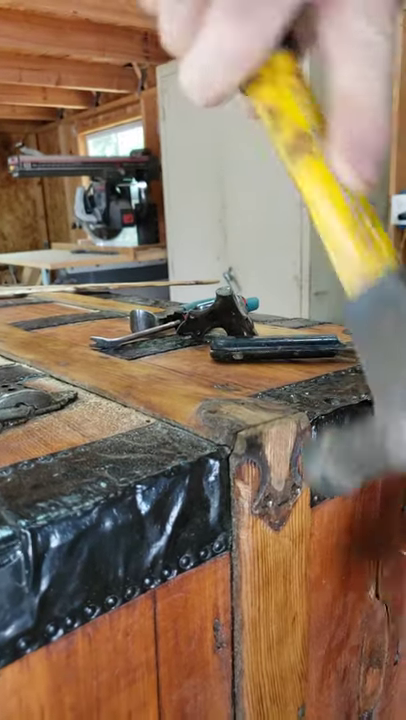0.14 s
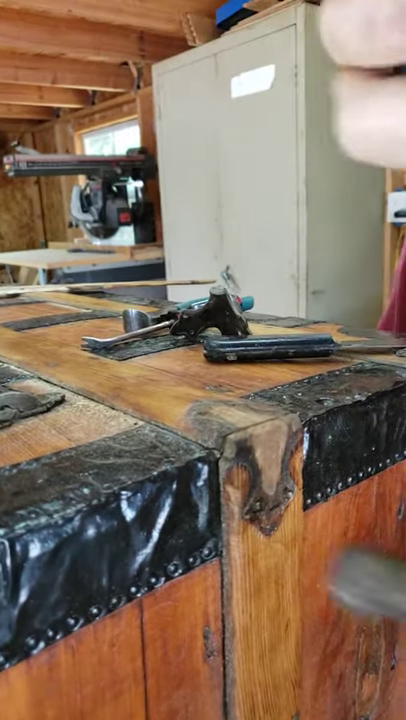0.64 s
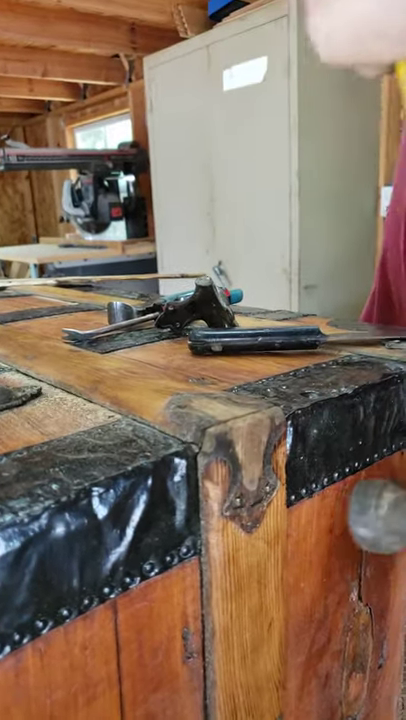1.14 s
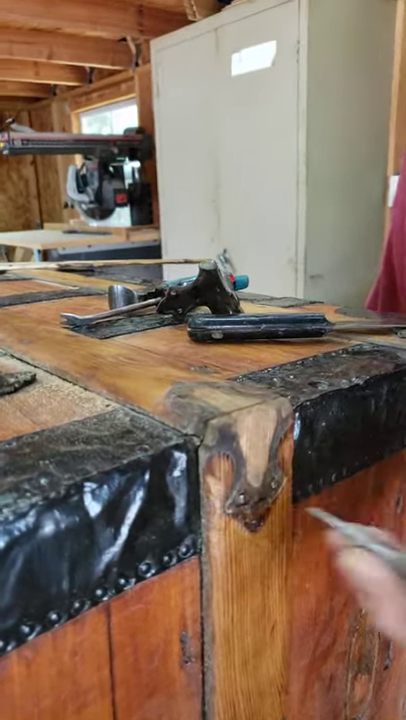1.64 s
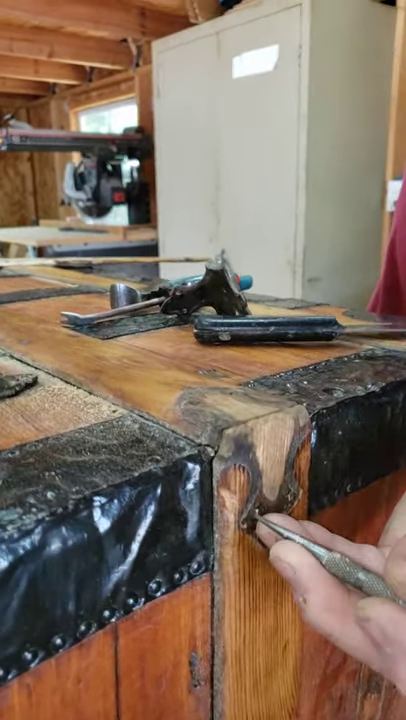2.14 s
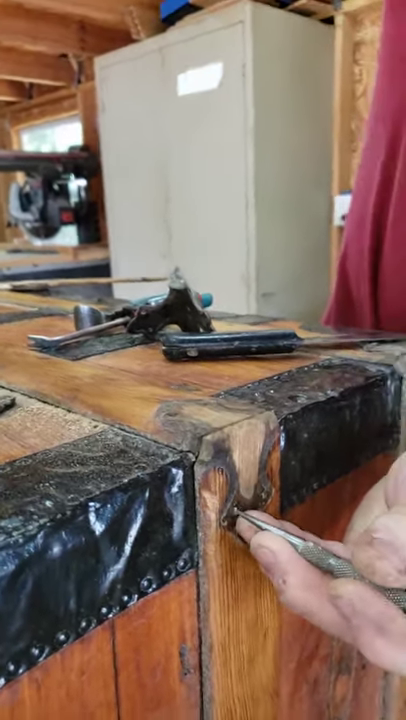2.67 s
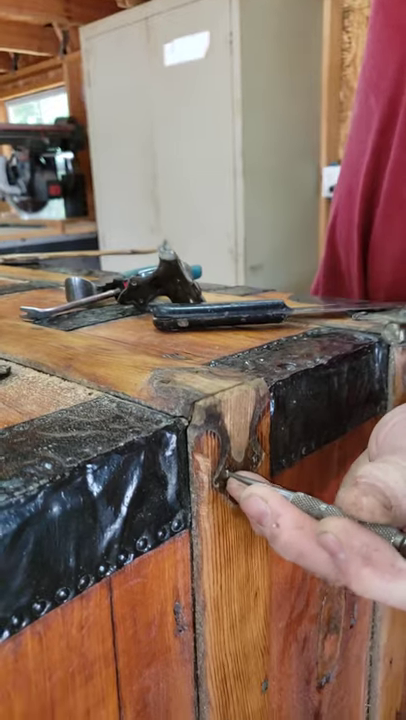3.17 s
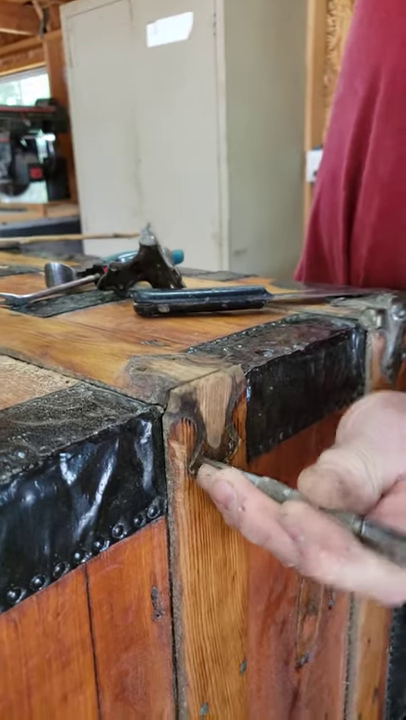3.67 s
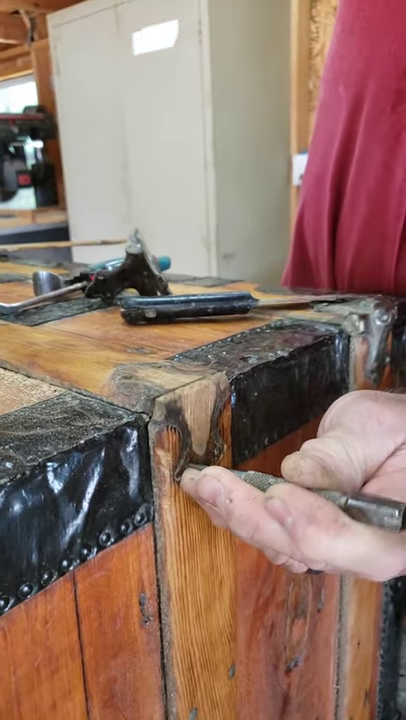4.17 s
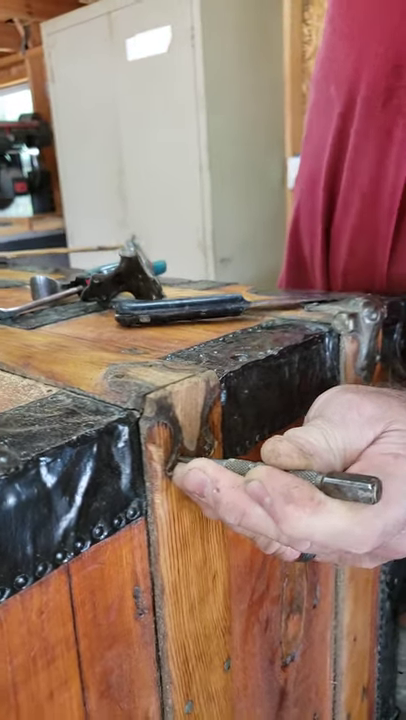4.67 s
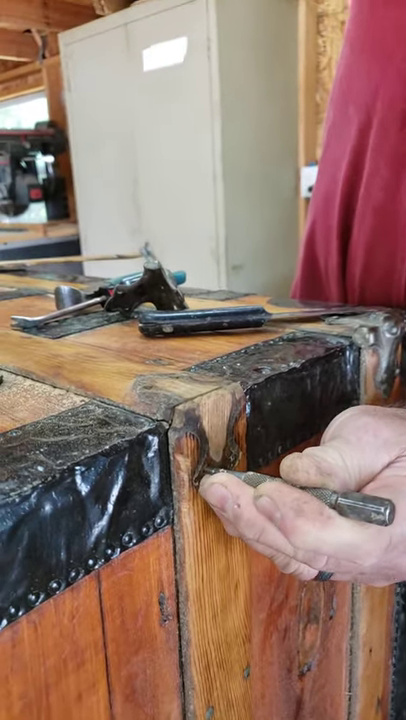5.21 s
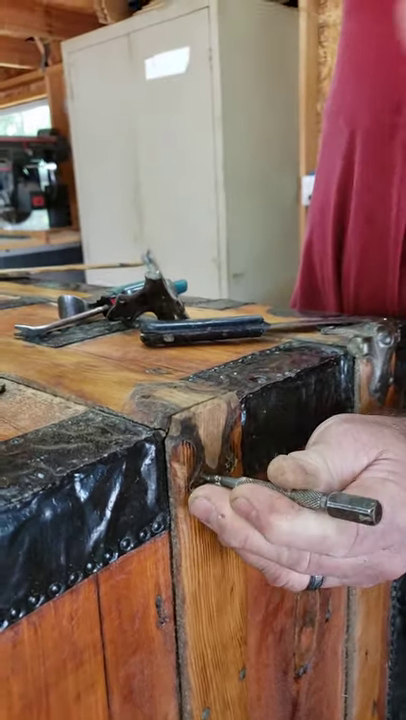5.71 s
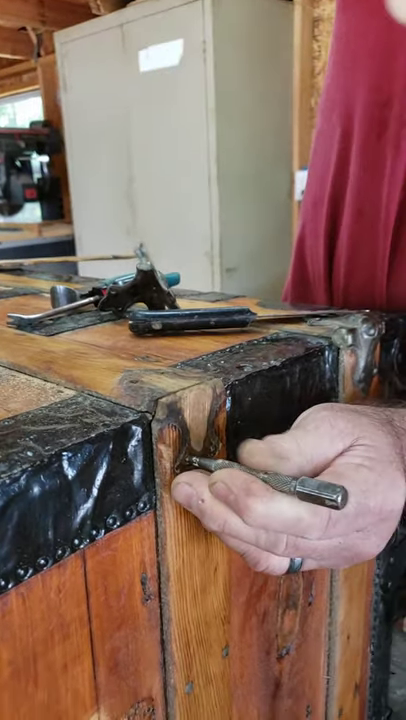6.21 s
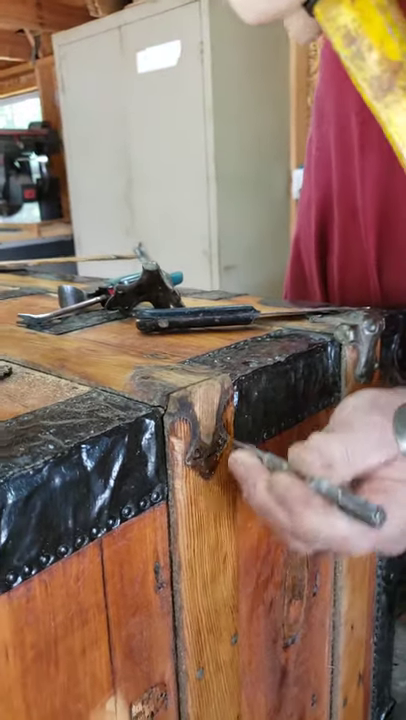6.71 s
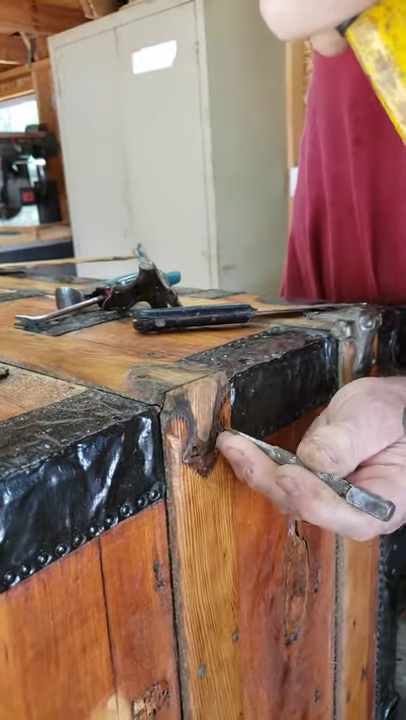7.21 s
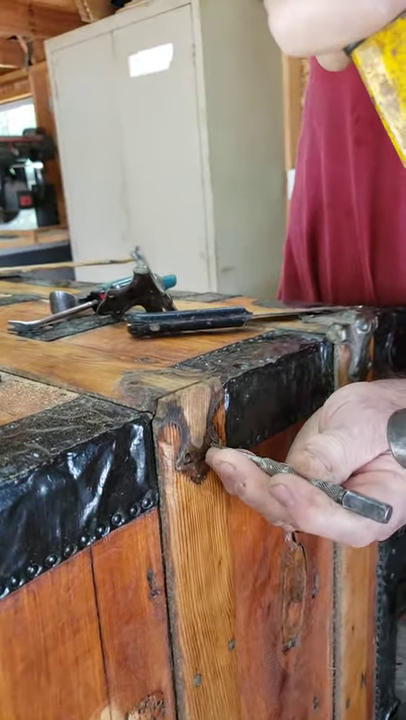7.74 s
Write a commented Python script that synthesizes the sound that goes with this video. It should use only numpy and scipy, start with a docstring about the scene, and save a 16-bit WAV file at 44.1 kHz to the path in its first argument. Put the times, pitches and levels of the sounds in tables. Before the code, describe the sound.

Quiet workshop hiss and a faint wavering mains hum, with a slight rustle and a soft low air puff near 0.3 s. Hard hammer blows crack on a hollow wooden chest at about 0.55, 0.9 and 1.35 s, each with an instant rebound, knocking boards, a deep short boom and a brief room tail; small scrapes fall between them. From 1.8 to 2.7 s only light touches, a tiny sharp tick near 2.6 and gusty low rumbles. A weaker, double punch tap comes at 3.3, then brighter steely blows at 3.7, 4.2, 4.55, 5.05, 5.4, 5.8 and 6.1 s, most doubled by a bounce; the one at 5.4 cracks hardest, with less boom. A strong low puff coincides with 3.7. After 6.4 s, soft bumps, one clearer at 6.8, then hiss and swelling hum return to the end, near 8 s.

```python
"""Hammer blows on nails in the corner post of a hollow wooden chest: first bare, then through a steel punch.
A blow is a spike and splinter noise (crack), decaying modes (punch ping, board knock, late chest boom)
and a click convolved with a noise tail (workshop). Touches are short noise bursts with nearby board modes.
Under them: gusty low noise (air puffs), wavering sines (mains hum), a faint rustle and coloured noise
(room tone); hum and tone sink a step per blow and creep back."""
import sys
import numpy as np
from scipy import signal
from scipy.fft import rfft, irfft
from scipy.io import wavfile
from scipy.ndimage import uniform_filter1d

SR = 44100
rng = np.random.default_rng(int(sys.argv[2]) if len(sys.argv) > 2 else 0)


def inscribe(sig):
    """Save sig as 16-bit PCM at rate SR to the path in sys.argv[1].

    A 1-D sig is mono; a 2-D sig holds one channel per row.
    Samples are clipped to [-1, 1] before scaling.
    """
    pcm = np.round(np.clip(np.atleast_2d(sig).T, -1, 1) * 32767)
    wavfile.write(sys.argv[1], SR, pcm.astype(np.int16))


def linear_from_db(decibels):
    """Turn decibels (scalar or array-like) into linear amplitude factors; 0 gives 1."""
    return 10 ** (np.asarray(decibels, float) / 20)


N = 346185
T = np.arange(N) / SR


def colour(x, table):
    """Filter by (f/Hz, level/dB) points joined on a log-frequency axis."""
    size = x.shape[-1]
    hz, db = np.transpose(table)
    f = np.maximum(np.arange(size // 2 + 1) * SR / size, 1)
    gain = linear_from_db(np.interp(np.log(f), np.log(hz), db))
    return irfft(rfft(x) * gain, size)


def band(x, lo_hz, hi_hz):
    """Causal band-pass."""
    sos = signal.butter(2, [lo_hz, min(hi_hz, .48 * SR)], "band", fs=SR, output="sos")
    return signal.sosfilt(sos, x)


def unit(x):
    """Scale to rms 1."""
    return x / np.sqrt(np.mean(x ** 2))


def pair(likeness, size):
    """Two noises with the given correlation."""
    c = np.clip(likeness, 0, 1)
    mid, side = rng.standard_normal((2, size))
    return np.sqrt((1 + c) / 2) * mid + np.sqrt((1 - c) / 2) * side * np.array([[1], [-1]])


def walk(rate_hz):
    """Random levels held 1 / rate_hz and slewed twice; spread near 1."""
    k = int(SR / rate_hz)
    steps = np.repeat(rng.standard_normal(N // k + 1), k)
    return 1.5 * uniform_filter1d(uniform_filter1d(steps, k), k)[:N]


def add(out, x, s):
    """Mix x into out from time s."""
    i = int(s * SR)
    out[..., i:i + x.shape[-1]] += x[..., :N - i]


def fade(t, t60_s):
    """Exponential decay, 60 dB in t60_s."""
    return np.exp(-np.log(1000) * t / t60_s)


def ring(modes, peak_s, scatter_db, seconds, polarity=1):
    """Decaying modes swelling up to peak_s, levels scattered per call; polarity < 0 opposes neighbours."""
    hz, db, t60_s = np.array(modes).T[..., None]
    t = T[:int(seconds * SR)]
    sign = polarity ** np.arange(len(modes))[:, None]
    gain = linear_from_db(db + scatter_db * rng.standard_normal(hz.shape)) * sign
    swell = 1 - np.exp(-(2.3 * t / peak_s) ** 2)
    swing = np.cos(2 * np.pi * hz * (t - peak_s))
    return swell * (gain * fade(t, t60_s) * swing).sum(axis=0)


SINK_STEP_DB, SINK_DEPTH_DB, SINK_HOLD_S, CREEP_DB_PER_S = 1.6, 8.5, 1.1, 4.5


def sink():
    """Background drop in dB: a step down per blow to a limit, a hold, a slow way back."""
    out, held, last_s = np.zeros(N), 0, 0
    for s in np.transpose(BLOWS)[0]:
        crept_db = CREEP_DB_PER_S * max(s - last_s - SINK_HOLD_S, 0)
        held = min(max(held - crept_db, 0) + SINK_STEP_DB, SINK_DEPTH_DB)
        after, last_s = T >= s, s
        out[after] = np.maximum(held - CREEP_DB_PER_S * np.maximum(T[after] - s - SINK_HOLD_S, 0), 0)
    return uniform_filter1d(out, size=4000)


TONE_DB, SELF_NOISE_DB = -51.5, -63  # rms in 1333-4000 Hz and 7700-13300 Hz, before sinking
SELF_NOISE_SINK = 1.35  # dB per dB of sink
# room hiss, relative spectrum: [f/Hz, level/dB]
TONE_COLOUR = [(20, -16), (32, -3), (50, 6), (78, 6.5), (100, 9), (160, 0.5), (310, 2), (500, -2),
               (700, -3.5), (1000, 1), (1600, -3), (2500, -3.5), (4000, -11.5), (5500, -18.5), (9000, -38)]
# room hiss, left-right correlation: [f/Hz, likeness 0-1]
TONE_LIKENESS = [(60, .9), (130, 0.3), (290, .75), (640, .55), (1400, 0), (16000, 0.1)]
# microphone self-noise, relative density: [f/Hz, level/dB]
MIC_HISS = [(2000, -16), (6000, 6), (9500, 2.5), (13000, 6), (16500, -1.5)]


def room_tone(sunk_db):
    """Broad hiss, alike in the bass and apart in the treble, over independent self-noise per microphone."""
    mid, side = rng.standard_normal((2, N))
    mid = colour(mid, [(hz, 10 * np.log10(1 + min(c, 1))) for hz, c in TONE_LIKENESS])
    side = colour(side, [(hz, 10 * np.log10(1.01 - min(c, 1))) for hz, c in TONE_LIKENESS])
    hiss = colour(np.array([mid + side, mid - side]), TONE_COLOUR)
    hiss /= np.std(band(hiss, 1333, 4000))
    self_noise = colour(rng.standard_normal((2, N)), MIC_HISS)
    self_noise /= np.std(band(self_noise, 7700, 13300))
    hiss_gain = linear_from_db(TONE_DB - sunk_db + 0.23 * walk(6))
    return hiss * hiss_gain + self_noise * linear_from_db(SELF_NOISE_DB - SELF_NOISE_SINK * sunk_db)


MAINS_HZ, HUM_WAVER_DB, HUM_WAVER_RATE_HZ = 60.4, 2, 7
# mains multiples 1 to 6 at rest: [level/dB rms]
HUM_DB = [-59, -60, -62, -63, -62, -65]
# swells of single multiples: [centre t/s, multiple, rise/dB, half length/s]
HUM_SWELLS = [(.3, 2, 5, .3), (.4, 4, 5, .25), (1.8, 6, 8, .5), (2.45, 3, 4, .3), (2.5, 6, 8, .3),
              (2.8, 1, 6, .15), (2.85, 4, 10, .35), (2.8, 5, 5, .15), (3.15, 2, 12, .3), (4.2, 1, 5, .9),
              (6.9, 1, 6, .35), (6.8, 2, 10, .45), (6.9, 3, 12, .25), (7.6, 1, 4, .3), (7.6, 2, 7, .25),
              (7.75, 3, 6, .3), (7.8, 4, 6, .3)]


def hum(sunk_db):
    """Mains multiples as sines wavering in level and phase, swelling one by one."""
    levels = np.array(HUM_DB)[:, None] - sunk_db
    for s, multiple, rise_db, half_s in HUM_SWELLS:
        levels[round(multiple) - 1] += rise_db * np.exp(-((T - s) / half_s) ** 2)
    out = np.zeros(N)
    for k, db in enumerate(levels):
        gain = np.sqrt(2) * linear_from_db(db + HUM_WAVER_DB * walk(HUM_WAVER_RATE_HZ))
        out += gain * np.sin(2 * np.pi * (k + 1) * MAINS_HZ * T + .5 * walk(4.6))
    return out


RUSTLE_S, RUSTLE_HALF_S, RUSTLE_DB = .26, .025, -58


def rustle():
    """Faint fluttering swish as the arm lifts the hammer: a low and a high noise band under one hump."""
    swish = unit(band(pair(.3, N), 150, 900)) + linear_from_db(-2.5) * unit(band(pair(.1, N), 3500, 16000))
    return linear_from_db(RUSTLE_DB + 3 * walk(60)) * np.exp(-((T - RUSTLE_S) / RUSTLE_HALF_S) ** 2) * swish


PUFF_RISE_SHARE, PUFF_RISE_MAX_S = .6, .022  # rise as a share of the fall, its limit
PUFF_UPPER_DB = -9  # upper rumble band over lower
# air puffs and handling: [peak t/s, level/dB, fall to 20 dB down/s, left minus right/dB]
PUFFS = [(0, -52, .1, 0.5), (0.27, -44, .3, 0.5), (0.43, -49, .05, -2), (1.282, -46, .08, 11),
         (1.86, -43, .12, -15), (1.95, -52, .2, 6), (2.082, -55, .1, 19), (2.27, -35.5, .15, 7),
         (2.33, -43, .1, 5), (2.39, -40, .14, 15), (2.475, -39, .03, 7), (2.63, -52, .04, -16),
         (2.73, -50, .2, 3), (3.19, -55, .1, 15), (3.44, -51, .1, 9), (3.514, -49, .06, 7),
         (3.69, -28, .11, -12), (3.8, -50, .12, -6)]


def puffs():
    """Gusty low rumble, partly its own on each port; a puff rises fast and mostly falls slower."""
    gain = np.zeros((2, N))
    low = unit(band(pair(0.13, N), 38, 90))
    high = unit(band(pair(.6, N), 90, 210))
    flutter = linear_from_db(3.3 * walk(34.74))
    for s, db, fall_s, pan_db in PUFFS:
        rise_s = min(PUFF_RISE_SHARE * fall_s, PUFF_RISE_MAX_S)
        away = np.where(T < s, (s - T) / rise_s, (T - s) / fall_s)
        gain += linear_from_db(db - 20 * np.minimum(away, 10)) * linear_from_db(pan_db * np.array([[.5], [-.5]]))
    return uniform_filter1d(gain, size=400) * flutter * (low + linear_from_db(PUFF_UPPER_DB) * high)


ECHO_RISE_S = .005
# workshop tail, octave bands: [centre f/Hz, level/dB, t60/s, left-right likeness 0-1]
SHOP = [(500, 6, .33, 0.2), (1000, -1, .33, 0.2), (1850, -2.5, 0.27, .05), (4180, -3.5, .27, .05),
        (8000, -5.5, 0.25, .05), (12900, -1.5, 0.19, .05), (16500, -7, 0.14, 0.3)]


def workshop():
    """Stereo room response: octave bands of noise, each fading at its own rate."""
    t = T[:int(.45 * SR)]
    tail = np.zeros((2, len(t)))
    for hz, db, t60_s, likeness in SHOP:
        octave = band(pair(likeness, len(t)), hz / np.sqrt(2), hz * np.sqrt(2))
        tail += linear_from_db(db) * fade(t, t60_s) * octave
    return linear_from_db(-29.5) * tail * np.minimum(t / ECHO_RISE_S, 1)


BOOM_PEAK_S = .0138  # the chest takes this long to swing fully
BOOM_SCATTER_DB, KNOCK_SCATTER_DB = 1.5, 2.5
TICK_DB, TICK_DB_PER_MS = 11, -2.4  # over knock; the longer the contact, the weaker the tick
# chest, air and panel modes, also for blows(): [f/Hz, level/dB, t60/s]
BOOM = [(58, -27, 0.18), (72.5, -25, 0.4), (91.6, -23.5, 0.47), (129.4, -13.5, 0.54), (140.4, -11, 0.41),
        (169.4, -11.5, 0.27), (178.8, 2.5, 0.27), (195.3, -8.5, 0.32), (213, -34.5, 0.9)]
# chest, board modes, also for blows(): [f/Hz, level/dB, t60/s]; touches scale level and t60
KNOCK = [(245, -9, .28), (259, -8, .28), (283, 2, .28), (312, -8, .28), (330, -10, .28), (347, -12, .28),
         (387, -13, .28), (420, -7, .32), (434, -3, .3), (469, -4, .32), (490, -8, .28), (528, -11, .25),
         (608, -4, .2), (646, -10, .23), (705, -12, .28), (745, -10, .25), (792, -8, .28), (887, -11, .28),
         (945, -11, .22), (1063, -12, .25), (1135, -13, .2), (1281, -13, .2)]
# light touches on the wood: [t/s, knock level/dB, pitch f/Hz, contact/ms, left minus right/dB]
TOUCHES = [(1.023, -45.5, 1500, 10.6, 11), (1.046, -49, 1500, 10.5, 10), (1.052, -43.5, 780, 11, 9),
           (1.083, -56, 1450, 7.2, 8.5), (1.092, -45, 720, 10.5, 5), (1.345, -47, 600, 6, 3),
           (1.829, -52, 1200, 4.9, 12), (1.905, -43, 1000, 6.5, 6.5), (1.965, -54, 1000, 6.7, 4),
           (2.6117, -39, 850, .45, 15), (3.996, -49.5, 1500, 3, 5.5), (4.325, -52, 1530, 4, 8),
           (5.599, -57, 1000, 3, 5), (6.435, -48, 1060, 8.5, 8), (6.785, -40, 850, 8, 4),
           (6.922, -52.5, 604, 7.6, 2.5), (6.975, -57, 963, 9.5, 2.5)]


def touches(near, send):
    """Broad tick, thud at the spot's pitch, nearby board modes, trace of boom; long contacts scrape longer."""
    t = T[:3000]
    for s, knock_db, hz, contact_ms, pan_db in TOUCHES:
        tick_db = knock_db + TICK_DB + TICK_DB_PER_MS * contact_ms
        scrape = rng.standard_normal(3000) * fade(t, 0.006 * max(contact_ms, .3))
        contact = (t == 0) + 0.33 * scrape
        tick = band(contact, 200, 6800)
        thud = band(contact, .65 * hz, 1.3 * hz)
        tap = linear_from_db(tick_db) * tick / np.abs(tick).max() + linear_from_db(knock_db + 8.5) * thud / np.abs(thud).max()
        # modes weaken away from the spot's pitch; short contacts die soonest
        t60_scale = np.clip(0.085 * contact_ms, .05, .7)
        local = [(f, db - 14 * np.log2(f / hz) ** 2, t60_scale * t60_s) for f, db, t60_s in KNOCK]
        # opposed neighbours, each 2.7 % stronger than the last
        knock = ring(local, .002, KNOCK_SCATTER_DB, seconds=.3, polarity=-1.027)
        pan = linear_from_db(np.array([[pan_db], [-pan_db]]) / 2)
        add(near, tap * pan, s)
        add(near, linear_from_db(knock_db) * knock * pan, s)
        add(send, linear_from_db(-7) * tap, s)
        add(near, linear_from_db(knock_db - 11) * ring(BOOM, BOOM_PEAK_S, BOOM_SCATTER_DB, seconds=0.58), s)


# wood, bite and steel ranges of a contact: [from f/Hz, to f/Hz]
RANGES_HZ = [(350, 2600), (2600, 7000), (7000, 16500)]


def three_ranges(wood, steel, bite_db, ping_db):
    """Wood, bite and steel ranges of a contact, each with its own weight."""
    lo, mid, hi = RANGES_HZ
    low = unit(band(wood, *lo))
    bite = linear_from_db(bite_db) * unit(band(steel, *mid))
    high = linear_from_db(ping_db) * unit(band(steel, *hi))
    # middle range inverted so that neighbours add where they meet
    return low - bite + high


CRACK_RISE_S, STEEL_SCATTER_DB = .0003, 4.5
PING_RING_DB = -9  # added to the blow's ping level
# punch and hammer head modes, relative: [f/Hz, level/dB, t60/s]
STEEL = [(5300, -1, 0.03), (9080, -3.5, 0.055), (11200, -5.5, 0.022), (11870, -5.5, 0.029),
         (13640, -38, .015)]


def crack(bite_db, ping_db):
    """Spike, splinter noise (longer in wood than steel) and ping; also the click that drives the room."""
    t = T[:int(.06 * SR)]
    noise = pair(0.35, len(t)) * np.minimum(t / CRACK_RISE_S, 1)
    spike = -1.6 * np.exp(-((t - .0004) / .00007) ** 2)
    wood = spike + noise * np.exp(-(t / .0045) ** 2)
    steel = spike + noise * np.exp(-(t / .003) ** 2)
    ping = linear_from_db(ping_db + PING_RING_DB) * unit(ring(STEEL, 0.001, STEEL_SCATTER_DB, seconds=.06))
    impulse = 1. * (t == 0)
    hit = linear_from_db(-14.5) * (three_ranges(wood, steel, bite_db, ping_db) + ping)
    click = linear_from_db(-12) * (three_ranges(impulse, impulse, bite_db, ping_db) + ping)
    return hit, click


BITE_PUNCH_DB, BITE_BARE_DB, BITE_DB_PER_PING_DB = -4, -14, .3  # over crack; the punch bites harder
KNOCK_PUNCH_DB, KNOCK_BARE_DB, KNOCK_SIDE = -12, -9, .25
KNOCK_BOOM_SHARE = .45  # boards follow a blend of boom and ring-on level
PANEL_TOP_HZ, PANEL_PEAK_S, PANEL_DB = 400, .012, 1.5  # lower board modes: wide panels, swinging up late
# the punch passes little between wood and steel ranges
PUNCH_GAP_HZ, PUNCH_GAP_Q, PUNCH_GAP_SHARE, ROOM_GAP_SHARE = 2900, 2.2, .6, .3
# spans in which the bare hammer face meets the wood: [from t/s, to t/s]
BARE = [(0, 2), (5.4, 5.5)]
# blows and rebounds, relative levels:
# [t/s, crack level/dB, boom level/dB, steel ping over crack/dB, ring-on over crack/dB]
BLOWS = [(0.5507, -5, -5.5, -13.5, -6.5), (0.5772, -5, -6.5, -20, -13.5), (0.8757, -5.5, -7.5, -15.5, -3.5),
         (0.9078, -16.5, -12, -33.5, -4.5), (1.3561, -10.5, -9, -8, .8), (1.3941, -7.5, -12, -16.5, -7),
         (3.3064, -12, -14.5, -15, -11), (3.3271, -22, -20, -35, -9.5), (3.6726, -12, -10, 0, -2),
         (4.1733, -6, -8, -12, -8), (4.5366, -11.5, -9.5, 0, -2), (4.5607, -19, -11.5, -9, -4.5),
         (5.033, -14, -11.5, -1, -0.5), (5.0492, -19, -13, -13, -4), (5.4199, -2.5, -22, -14.5, -7.5),
         (5.4647, -4, -13, -13, -9.5), (5.8026, -11.5, -8.5, -7.5, 1.5), (5.8271, -10.5, -10.5, -9, -7.5),
         (6.1212, -14.5, -9.5, -1.5, 0.5), (6.1409, -14, -8.5, -9.5, -2.5)]


def knocking(panels, boards):
    """One draw of the board modes, neighbours opposed: boards peak early, wide panels late."""
    early = ring(boards, 0.00303, KNOCK_SCATTER_DB, seconds=0.54, polarity=-1)
    late = ring(panels, PANEL_PEAK_S, KNOCK_SCATTER_DB, seconds=0.54, polarity=-1)
    return early + linear_from_db(PANEL_DB) * late


def blows(near, send):
    """Crack at once, boards knocking just after, the hollow chest booming last."""
    panels = [m for m in KNOCK if m[0] < PANEL_TOP_HZ]
    boards = [m for m in KNOCK if m[0] >= PANEL_TOP_HZ]
    gap = signal.iirpeak(PUNCH_GAP_HZ, PUNCH_GAP_Q, SR)
    for s, crack_db, boom_db, ping_db, on_db in BLOWS:
        bare = any(t0 < s < t1 for t0, t1 in BARE)
        bite_db = (BITE_BARE_DB if bare else BITE_PUNCH_DB) + BITE_DB_PER_PING_DB * ping_db
        blend_db = KNOCK_BOOM_SHARE * boom_db + (1 - KNOCK_BOOM_SHARE) * (crack_db + on_db)
        knock_db = (KNOCK_BARE_DB if bare else KNOCK_PUNCH_DB) + blend_db
        hit, click = crack(bite_db, ping_db)
        if not bare:
            hit = hit - PUNCH_GAP_SHARE * signal.lfilter(*gap, hit)
            click = click - ROOM_GAP_SHARE * signal.lfilter(*gap, click)
        add(near[1], linear_from_db(crack_db) * hit[1], s)
        add(near[0], linear_from_db(crack_db) * hit[0], s + 7 / SR)  # the left port is further from the nail
        add(send, linear_from_db(crack_db + on_db) * click, s)
        add(near, linear_from_db(boom_db) * ring(BOOM, BOOM_PEAK_S, BOOM_SCATTER_DB, seconds=.7), s)
        mid = knocking(panels, boards)
        side = KNOCK_SIDE * knocking(panels, boards)
        add(near, linear_from_db(knock_db) * np.array([mid + side, mid - side]), s)


def hammering():
    """Direct sound of all contacts, and the room answering their clicks."""
    near, send = np.zeros((2, N)), np.zeros(N)
    blows(near, send)
    touches(near, send)
    return near + signal.fftconvolve(send[None], workshop(), axes=1)[:, :N]


def scene():
    """All sources at the microphone pair."""
    sunk_db = sink()
    return room_tone(sunk_db) + hum(sunk_db) + rustle() + puffs() + hammering()


def band_limit(x):
    """A steep low-pass at the top of the band."""
    return signal.sosfilt(signal.butter(12, 17090, fs=SR, output="sos"), x)


# microphone pair, difference in colour: [f/Hz, left minus right/dB]
PORTS = [(60, -1.0), (110, 2.5), (200, -4.5), (380, -0.5), (700, -3.5), (1290, 1.5), (2380, 0), (4400, 2),
         (8120, -5), (15000, -6)]
# microphone colour, both ports: [f/Hz, level/dB]
MIC = [(20, 2), (5000, -0.5), (7500, -2.5), (9800, -1.5), (12300, 0.5), (15000, 0), (17000, -11.5)]


def record(dry):
    """The microphones share a treble dip and bump, the ports differ in colour, loud peaks are rounded."""
    left = colour(dry[0], [(hz, db / 2) for hz, db in PORTS])
    right = colour(dry[1], [(hz, -db / 2) for hz, db in PORTS])
    heard = colour(np.array([left, right]), MIC)
    mix = np.tanh(0.72 * heard) / 0.88
    return band_limit(mix)


dry = scene()
out = record(dry)
inscribe(out)
```